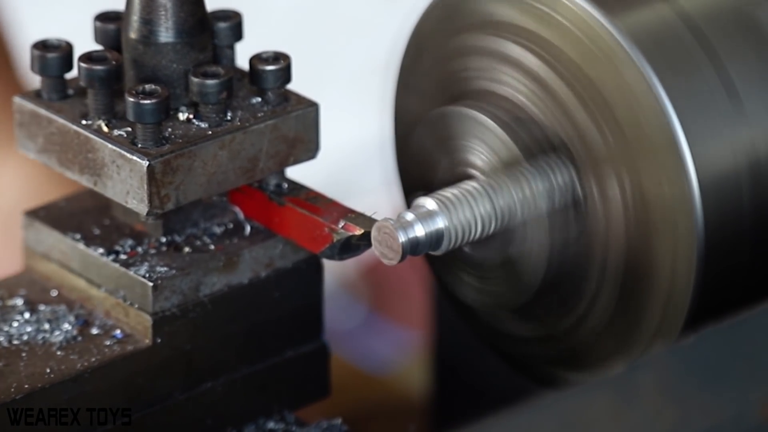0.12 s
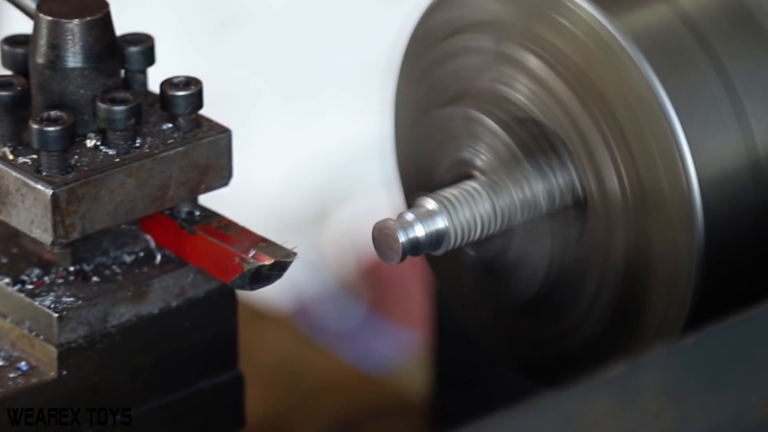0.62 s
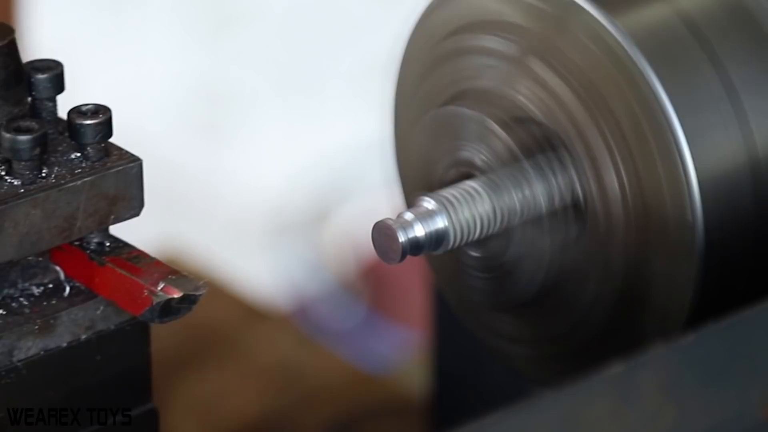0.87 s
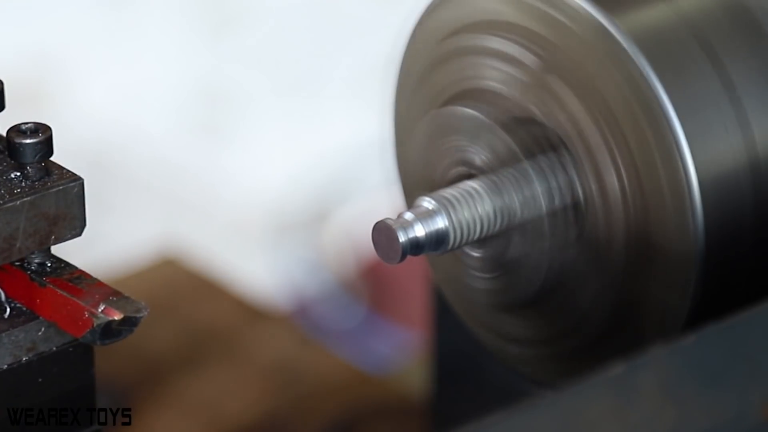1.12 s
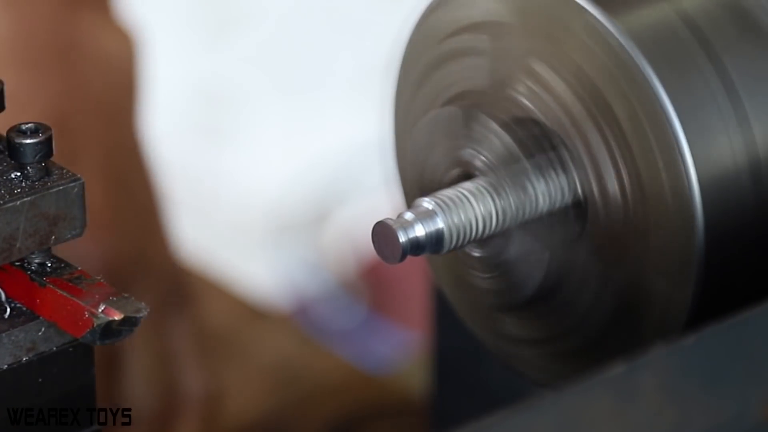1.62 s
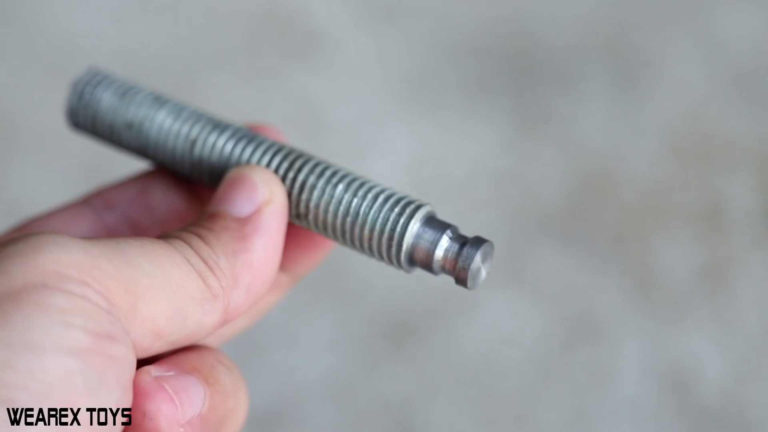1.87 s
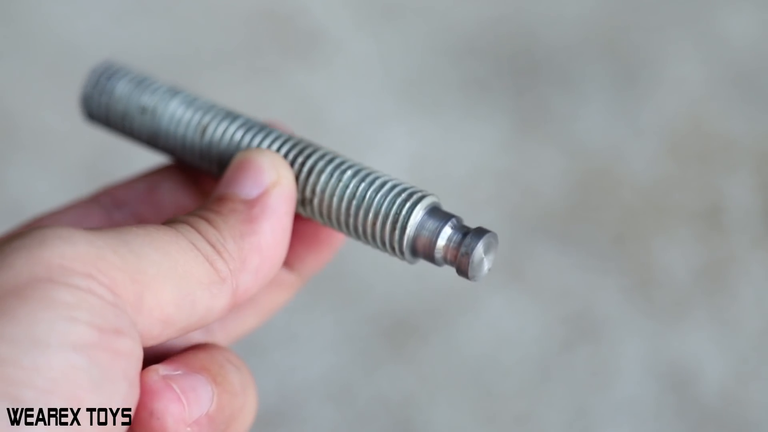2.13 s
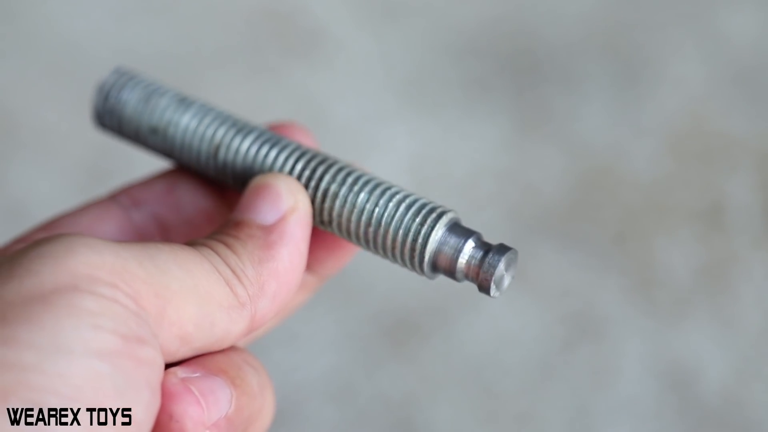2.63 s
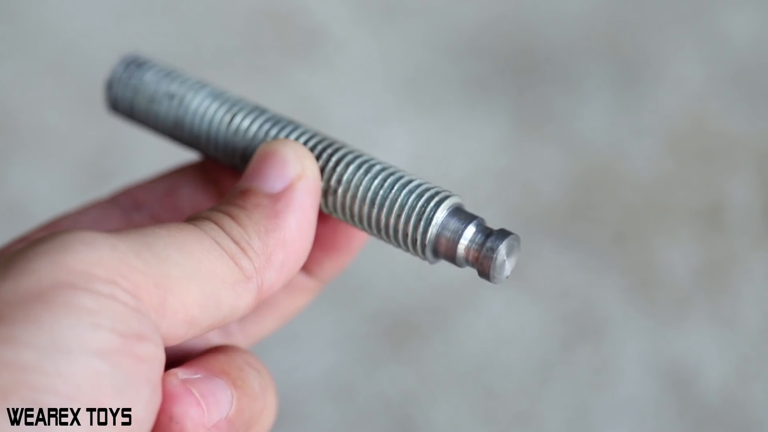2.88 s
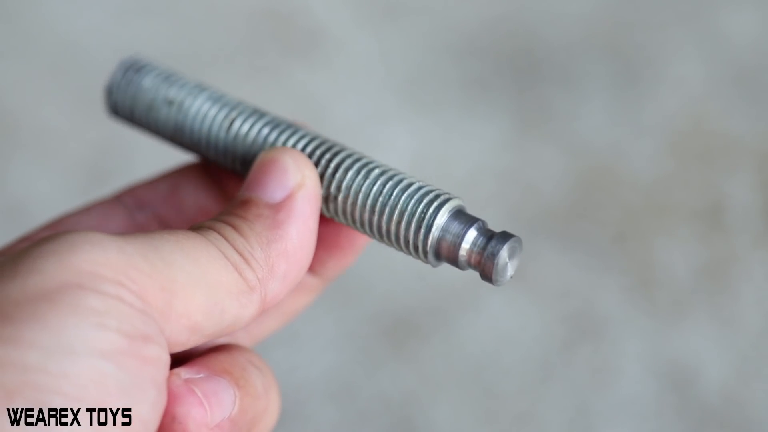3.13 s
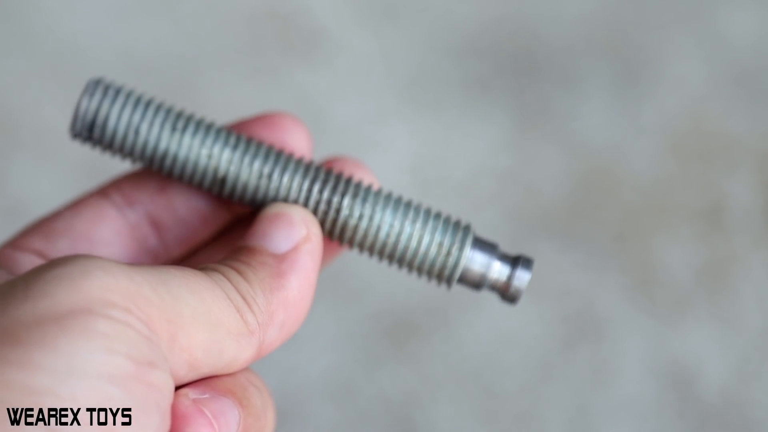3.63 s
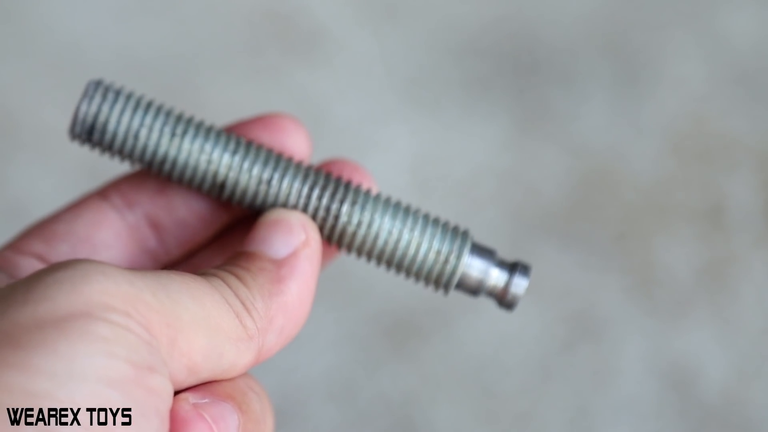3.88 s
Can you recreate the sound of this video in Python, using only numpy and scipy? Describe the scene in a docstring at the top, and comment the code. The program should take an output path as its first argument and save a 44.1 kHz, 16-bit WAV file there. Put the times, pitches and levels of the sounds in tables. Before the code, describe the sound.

Close, bright stereo lathe noise: pulsing metallic rattle, gear whine, chattering squeaks, sagging slightly after switch-off. A sudden cut leaves much quieter open air, with low traffic rumble, a wavering hum and soft airy swishes.

```python
"""A small lathe rattles, whines and squeaks close by, then the sound cuts hard to a quiet yard with distant traffic.
Lathe: noise and tooth clicks, pulsing with the shafts, ring the cast headstock; sine tones whine and die away
after switch-off; a noisy resonance chatters and squeaks; decaying sines make the carriage's soft knocks.
Yard: coloured noise makes the receding traffic and the swishes going by; narrow wavering tones make
a drone, distant engines and faint whistles."""
import sys
import numpy as np
from scipy import signal
from scipy.fft import rfft, irfft
from scipy.io import wavfile
from scipy.ndimage import uniform_filter1d

SR = 44100
rng = np.random.default_rng(int(sys.argv[2]) if len(sys.argv) > 2 else 0)


def linear_from_db(decibels):
    """Turn decibels (scalar or array-like) into linear amplitude factors; 0 gives 1."""
    return 10 ** (np.asarray(decibels, float) / 20)


def materialize(psi):
    """Save the field psi as 16-bit PCM at rate SR to the path in sys.argv[1].

    A 1-D psi becomes a single channel; in a 2-D psi each row is a channel.
    """
    bounded = np.clip(np.atleast_2d(psi).T, -1, 1)
    quanta = np.round(bounded * 32767).astype(np.int16)
    wavfile.write(sys.argv[1], SR, quanta)


N = 176400
T = np.arange(N) / SR  # time [s]
F = np.maximum(np.fft.rfftfreq(N, 1 / SR), 1)  # frequency [Hz], kept above zero
CUT_S, SWITCH_OFF_S = 1.8947, 1.3  # jump to the yard, lathe motor switched off

# Lathe's stereo width: (frequency [Hz], side over mid [dB])
LATHE_SIDE = [(60, -11), (400, -21), (1300, -7.5), (3000, -2.5), (8000, 3.5), (15000, -0.5)]
# Lathe's lean: (frequency [Hz], left minus right [dB])
LATHE_PAN = [(100, 2), (1300, 4), (3000, 2), (8000, -2)]
# Yard's stereo width: (frequency [Hz], side over mid [dB])
YARD_SIDE = [(60, -18), (200, -13.5), (700, -5), (2400, 1.5), (15000, -0.5)]
# Yard's lean: (frequency [Hz], left minus right [dB])
YARD_PAN = [(60, 2.5), (400, 3), (15000, 0)]
# Loudest squeaks of the chatter: (start [s], peak level ahead of the stereo stage [dB], middle pitch [Hz])
CHIRPS = [(0.0365, -12.5, 2840), (0.0913, -12.5, 2830), (0.1513, -8.5, 2840), (0.3142, -11.5, 2850),
          (0.355, -12, 2900), (0.4316, -23, 2850), (0.4784, -14, 2830), (0.554, -12, 2920),
          (0.6372, -14, 2920), (0.691, -17, 2900), (0.758, -15, 3020), (0.8545, -17, 2790),
          (0.8826, -9.5, 2830), (0.9996, -15.5, 2760), (1.0324, -15, 2760), (1.0864, -12.5, 2840),
          (1.171, -13, 2900), (1.2121, -16, 2890), (1.2775, -14, 2780), (1.2986, -13, 2930),
          (1.394, -11, 2820)]


def level(x, db):
    """Scale a sound to an rms level in dB."""
    return x * linear_from_db(db) / np.sqrt(np.mean(x ** 2))


def curve(table, count):
    """Draw one column of a time table as a line through its points."""
    points = np.array(table)
    return np.interp(T, points[:, 0], points[:, count])


def gain(table):
    """Gain at every frequency from (frequency [Hz], level [dB]) points."""
    points = np.array(table)
    return linear_from_db(np.interp(np.log(F), np.log(points[:, 0]), points[:, 1]))


def ring(hz, width_hz):
    """Resonance that favours frequencies near its centre, where its gain is 1."""
    return 1 / (1 + 1j * (F / hz - hz / F) * hz / width_hz)


def band(lo_hz, hi_hz):
    """Pass a band of frequencies with soft edges."""
    return 1 / np.sqrt((1 + (lo_hz / F) ** 8) * (1 + (F / hi_hz) ** 8))


def walk(rate):
    """Slow random wander: levels held 1 / rate s, then smoothed twice; spread near 1."""
    hold = int(SR / rate)
    steps = rng.standard_normal(N // 64)
    held = np.repeat(steps[:N // hold + 1], hold)
    smooth = uniform_filter1d(uniform_filter1d(held, hold), hold)
    return 1.3 * smooth[:N]


def stereo(mid, side, colour, side_table, pan_table):
    """Colour a shared and an unshared sound, set the stereo width, and lean them left or right."""
    share = .2  # part of the side's power taken from the mid, shifted by a quarter cycle
    lean = np.sqrt(gain(pan_table))
    m = rfft(mid) * colour
    own = rfft(side) * colour
    s = (1j * np.sqrt(share) * m + np.sqrt(1 - share) * own) * gain(side_table)
    return irfft(np.array([(m + s) * lean, (m - s) / lean]), N)


def quiver(hz, width_hz):
    """A narrow noisy tone: a sine and a cosine of moving pitch, each with its own random strength."""
    turn = 2 * np.pi * np.cumsum(hz) / SR
    return level(walk(width_hz) * np.sin(turn) + walk(width_hz) * np.cos(turn), 0)


def hum(hz, width_hz):
    """A steady tone with a little noise around the same moving pitch."""
    tone = np.sin(2 * np.pi * (np.cumsum(hz) / SR + rng.random()))
    return level(quiver(hz, width_hz) + 3 * tone, 0)


def traffic():
    """Receding traffic: coloured noise in three bands, each with its own falling and flickering level."""
    # Traffic level: (time [s], rumble level [dB], middle level [dB])
    course = [(1.9, -32.5, -34), (2.5, -33.5, -38), (2.85, -33, -38), (3.2, -36.5, -38.5),
              (3.6, -36.5, -39), (4, -38.5, -40.5)]
    # Traffic colour: (frequency [Hz], level per Hz [dB])
    colour = [(30, -17.5), (60, -7.5), (120, -4.5), (175, -5.5), (350, -3.5), (460, -2.5), (700, -14.5),
              (1000, -16), (1280, -13), (1450, -18), (2500, -23.5), (5500, -26), (10000, -35.5),
              (15700, -47)]
    hiss_db = -45.5 - 1.5 * (T - CUT_S)
    bands = [(curve(course, count=1), 10, 560, .5),
             (curve(course, count=2), 560, 3500, .8),
             (hiss_db, 3500, 17000, 1.2)]
    out = 0
    for db, lo_hz, hi_hz, flicker_db in bands:
        noise = rng.standard_normal((2, N))
        part = stereo(*noise, gain(colour) * band(lo_hz, hi_hz), YARD_SIDE, YARD_PAN)
        out = out + level(part, 0) * linear_from_db(db + flicker_db * walk(8.8))
    return out


def engines():
    """Distant engines: narrow hums that glide in pitch and fade."""
    # Engine hums: (pitch at the cut [Hz], glide [Hz per s], level at the cut [dB], change of level [dB per s])
    hums = [(115.2, 17.5, -40.5, -10), (178.6, -10, -39.5, -3)]
    since = T - CUT_S
    return sum(hum(hz + glide * since, 11) * linear_from_db(db + fade_db * since) for hz, glide, db, fade_db in hums)


def swishes():
    """Airy swishes going by: hissing noise that swells and dies away around each peak."""
    # Swishes: (peak [s], time to rise or fall by a factor e [s], peak level [dB])
    passes = [(2.003, 0.046, -50.5), (2.414, 0.086, -39.5), (3.62, 0.056, -50)]
    air = level(stereo(*rng.standard_normal((2, N)), band(2400, 10000), YARD_SIDE, YARD_PAN), 0)
    return air * sum(linear_from_db(db) * np.exp(-np.abs(T - s) / fall_s) for s, fall_s, db in passes)


def drone():
    """A wavering drone: a slowly rising narrow hum, a little louder on the left."""
    # Drone level, before the lean to the left: (time [s], level [dB])
    course = [(1.9, -38), (2.15, -36.5), (2.35, -48), (2.55, -39), (2.67, -47), (2.695, -28), (2.78, -29.5),
              (2.86, -39.5), (2.91, -40), (2.99, -27.5), (3.06, -45), (3.13, -31.5), (3.21, -40.5),
              (4, -44.5)]
    hz = 406 * (1 + 0.004 * walk(5.02)) + 9 * (T - CUT_S)  # rises 9 Hz per s
    return hum(hz, 17) * linear_from_db(curve(course, count=1)) * linear_from_db([[1.5], [-1.5]])


def whistles():
    """Faint wavering tones that swell and fade, a little louder on the left."""
    # Tones, before the lean: (start [s], length [s], start pitch [Hz], glide [Hz per s], level at the swell [dB])
    tones = [(3.2, .12, 2040, -500, -48), (3.32, .3, 2180, 100, -49), (3.44, .16, 465, 0, -39)]
    out = 0
    for s, length, hz, glide, db in tones:
        shape = np.sin(np.pi * np.clip((T - s) / length, 0, 1))
        pitch = hz * (1 + 0.01028 * walk(30)) + glide * (T - s)
        out = out + linear_from_db(db) * shape * quiver(pitch, hz / 10) * linear_from_db([[1.6], [-1.6]])
    return out


def yard():
    """The quiet yard: all its sounds simply add up in the air."""
    return traffic() + engines() + swishes() + drone() + whistles()


def knocks():
    """Soft carriage knocks: each contact sets a few tones ringing, and they die away."""
    # Knocks: (start [s], level [dB])
    contacts = [(.528, -35), (.588, -37), (.601, -30), (.610, -29), (.624, -28)]
    # Ringing tones: (pitch [Hz], level added to the knock's [dB], time to decay by 60 dB [s])
    modes = [(350, 0, .055), (500, 1, .055), (700, -2, .045), (910, 4, .07)]
    out = np.zeros(N)
    for s, db in contacts:
        age = np.maximum(T - s, 0)
        onset = np.minimum(age / 0.001, 1)  # 1 ms rise makes the contact soft
        for hz, mode_db, t60 in modes:
            tone = np.sin(2 * np.pi * (hz * age + rng.random()))
            out += linear_from_db(db + mode_db) * tone * np.exp(-np.log(1000) * age / t60) * onset
    return out


def whine():
    """Whine of the meshing gears: sines that sag in pitch and fade once the motor is off."""
    # Mesh tones while the motor is on, around which the level wanders: (pitch [Hz], rms level [dB])
    tones = [(1276, -43.5), (1797, -36.5), (2842, -36), (3564, -32.5)]
    after = np.maximum(T - SWITCH_OFF_S, 0)
    out = 0
    for hz, db in tones:
        speed = 1 + 0.00097 * walk(23.4) - 0.0093 * after
        turn = 2 * np.pi * hz * np.cumsum(speed) / SR
        loudness = np.sqrt(2) * linear_from_db(db + 1.8 * walk(40) - 16 * after)  # fades 16 dB per s
        out = out + loudness * np.sin(turn + [[0], [hz / 3000]])  # right channel is shifted in phase
    return out


def chatter():
    """Resonances that chatter in bursts: narrow noise, stirred up by each squeak and fading after switch-off."""
    # Resonances: (pitch [Hz], width [Hz], level before stirring, bursts, fade and stereo [dB])
    resonances = [(2850, 300, -33), (1412, 180, -39)]
    bursts_per_s, burst_db, wobble = 70, 3, .016  # wobble is a fraction of the pitch
    stir_db, stir_s = 9, .045  # each squeak lifts the chatter, and the lift dies away
    stirs = [(T > s) * np.exp(-np.abs(T - s) / stir_s) for s, _, _ in CHIRPS]
    stir = stir_db * np.max(stirs, axis=0)
    fade_db = -30 * np.maximum(T - SWITCH_OFF_S, 0)
    out = 0
    for centre_hz, width_hz, db in resonances:
        hz = centre_hz * (1 + wobble * walk(bursts_per_s))
        sound = stereo(quiver(hz, width_hz), quiver(hz, width_hz), 1, LATHE_SIDE, LATHE_PAN)
        lift_db = stir * hz.mean() / resonances[0][0]  # a lower resonance is stirred less
        out = out + sound * linear_from_db(db + lift_db + burst_db * walk(bursts_per_s) + fade_db)
    return out


def chirps():
    """Short squeaks of the chattering resonance: sines that rise in pitch under a rounded swell."""
    length_s, rise_hz_s = 0.0094, 8000
    out = np.zeros(N)
    for s, db, hz in CHIRPS:
        age = np.clip(T - s, 0, length_s)
        swell = np.sin(np.pi * age / length_s)
        cycles = (hz + rise_hz_s * (age - length_s) / 2) * age
        out += linear_from_db(db) * swell * np.sin(2 * np.pi * (cycles + rng.random()))
    return stereo(out, np.roll(out, 40), 0.86, LATHE_SIDE, LATHE_PAN)  # the side comes 40 samples later


def teeth():
    """Loose gear teeth: random clicks of uneven size over a smooth roar of noise."""
    chance, sign, size = rng.random((3, N))
    hit = chance < 2500 / SR  # about 2500 clicks per s
    clicks = hit * np.sign(sign - .5) * linear_from_db(-3 * np.log(size + 0.0067))  # sizes spread by about 3 dB
    return level(clicks, -3.5) + rng.standard_normal(N)


def shaft_beat():
    """Pulsing loudness: each shaft swells the rattle once per turn, at a slightly uneven speed."""
    # Shafts: (speed [turns per s], pulse depth [0-1])
    shafts = [(34.9, 0.13), (78.9, 0.12)]
    beat = linear_from_db(1.8 * walk(30.03))
    for rate, depth in shafts:
        turns = np.cumsum(rate * (1 + 0.013 * walk(2.8))) / SR
        beat = beat * (1 + depth * np.sin(2 * np.pi * turns + 6 * rng.random()))
    return beat


def rattle():
    """Gear rattle heard through the cast headstock, whose resonances ring; treble pulses more than bass."""
    # Rattle level: (time [s], rattle level [dB], treble hiss level [dB])
    course = [(0, -21.5, -24.5), (.4, -21.5, -24.5), (1.2, -21.5, -25.5), (1.5, -20.5, -24),
              (1.9, -21.5, -26)]
    # Broad colour of the casting: (frequency [Hz], level per Hz [dB])
    casting = [(25, -52), (60, -29.5), (800, -24.5), (1030, -25), (1200, -16), (1550, -14), (1900, -12.5),
               (2300, -11), (2600, -6), (3300, -6.5), (3900, -14), (5000, -14), (8100, -22), (9000, -17),
               (12000, -22.5), (13000, -14.5), (15250, -14.5), (15900, -32)]
    # Headstock resonances: (pitch [Hz], width before squaring the resonance [Hz], peak gain [dB])
    headstock = [(409, 134, -19), (644, 45, -15), (870, 52, -17.5), (1340, 267, -12), (1696, 73, -7),
                 (2404, 35, -2.5), (3623, 120, -3.5), (3873, 100, -6), (4080, 80, -6), (4480, 21, -4.5),
                 (6140, 96, -9), (6570, 115, -12.5)]
    peaks = sum(np.abs(linear_from_db(db) * ring(hz, width_hz) ** 2) ** 2 for hz, width_hz, db in headstock)
    body = np.sqrt(gain(casting) ** 2 + peaks)
    beat = shaft_beat()
    drive = (teeth(), teeth())
    # level [dB], band edges [Hz], how strongly the band follows the beat (a power)
    bands = [(-42.5 + 3 * T, 20, 1000, .2),
             (curve(course, count=1), 1000, 6000, .6),
             (curve(course, count=2) + 1.26 * walk(59.64), 6000, 17000, 1.1)]
    out = 0
    for db, lo_hz, hi_hz, beat_share in bands:
        part = stereo(*drive, body * band(lo_hz, hi_hz), LATHE_SIDE, LATHE_PAN)
        out = out + level(part * beat ** beat_share, 0) * linear_from_db(db)
    return out


def lathe():
    """The lathe: knocks, whine, chatter, squeaks and rattle add up."""
    return knocks() + whine() + chatter() + chirps() + rattle()


def scene():
    """Lathe up to the cut, yard after it, joined by a half-millisecond crossfade."""
    fade = np.clip((T - CUT_S) / .0005, 0, 1)
    return yard() * fade + lathe() * (1 - fade)


def low_pass(x):
    """Removes everything above the highest recorded frequency."""
    return signal.sosfilt(signal.butter(12, 16540, fs=SR, output="sos"), x)


def record(dry):
    """A steep low-pass filter removes the treble above 15700 Hz."""
    top = signal.ellip(16, .2, 80, 15700, fs=SR, output="sos")
    mix = signal.sosfilt(top, dry)
    return low_pass(mix)


dry = scene()
out = record(dry)
materialize(out)
```